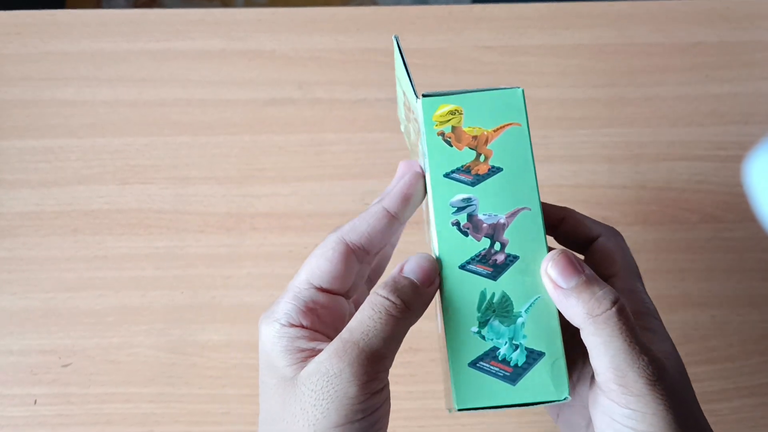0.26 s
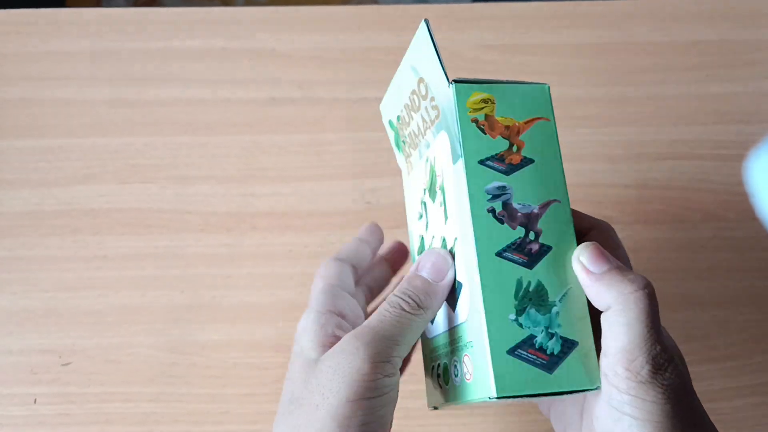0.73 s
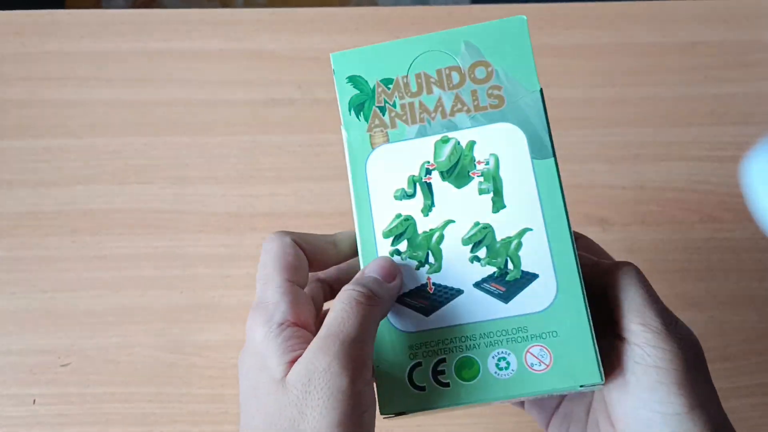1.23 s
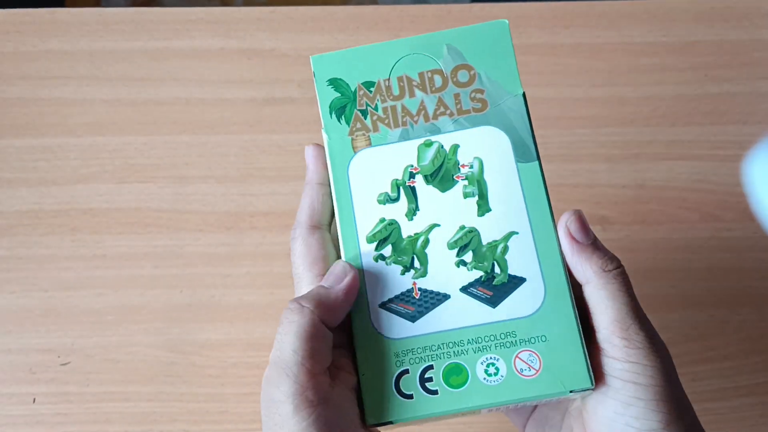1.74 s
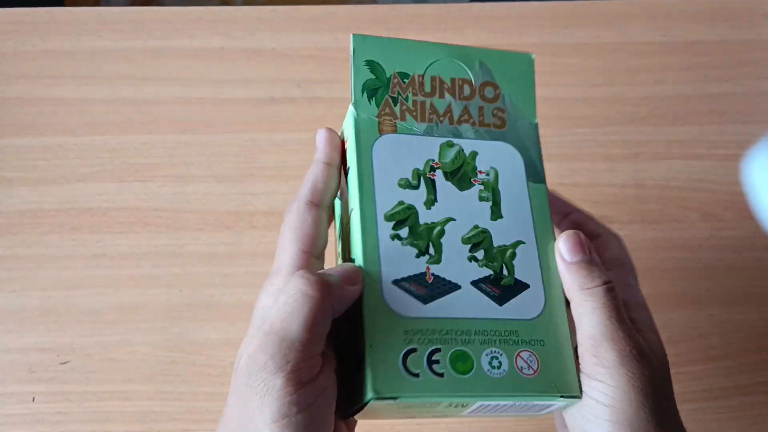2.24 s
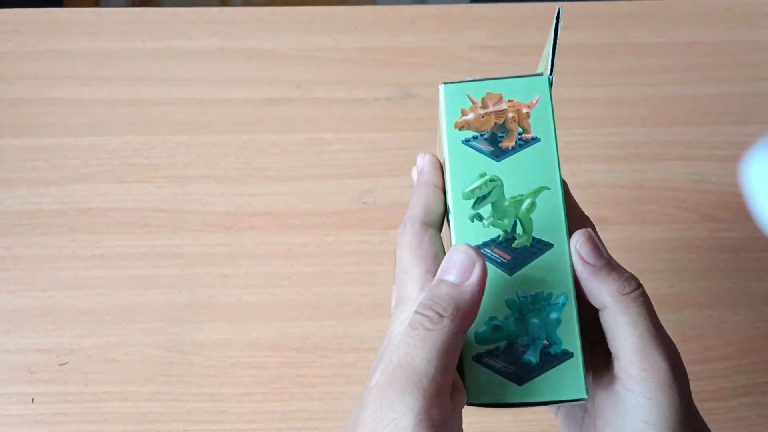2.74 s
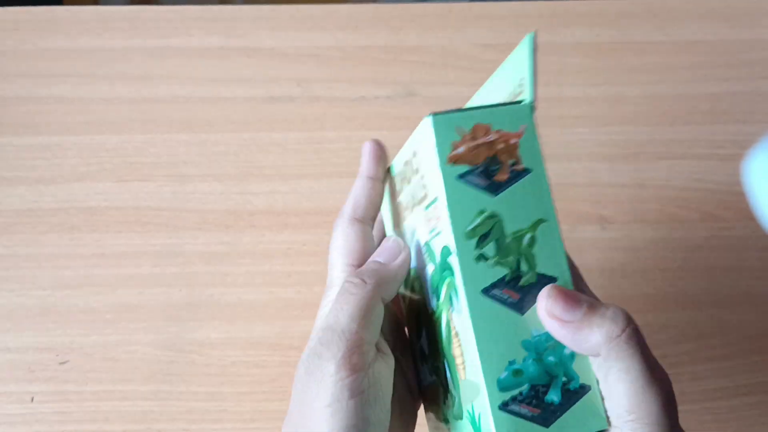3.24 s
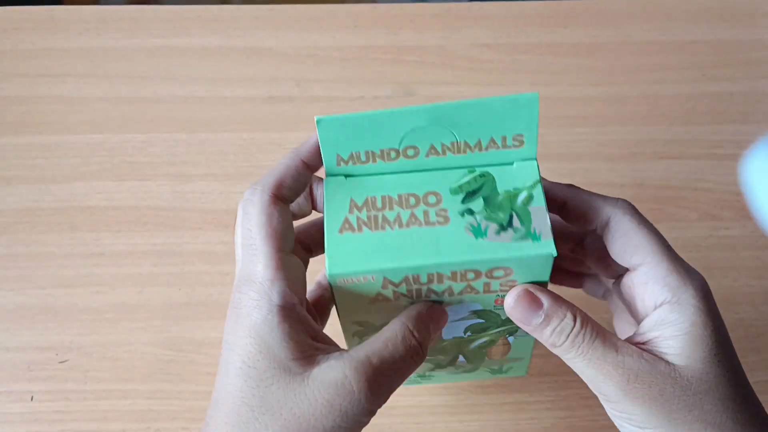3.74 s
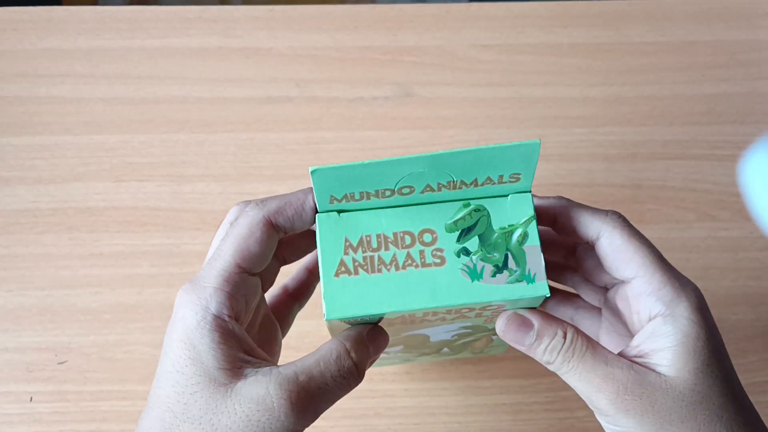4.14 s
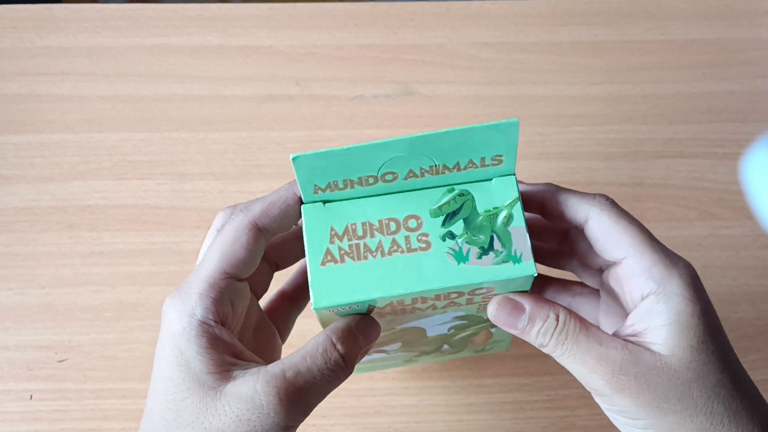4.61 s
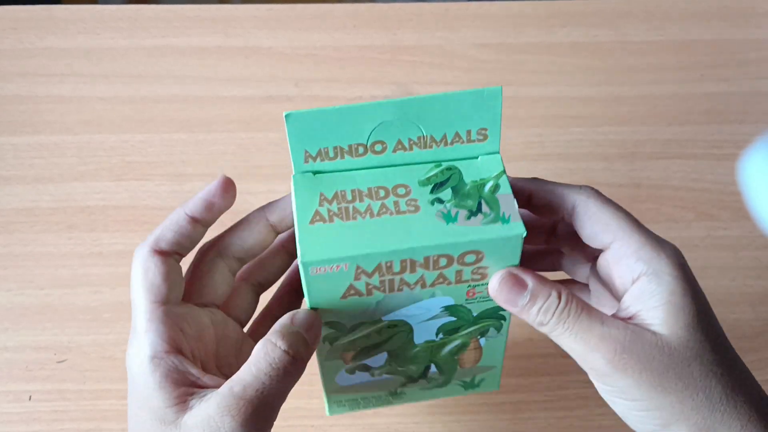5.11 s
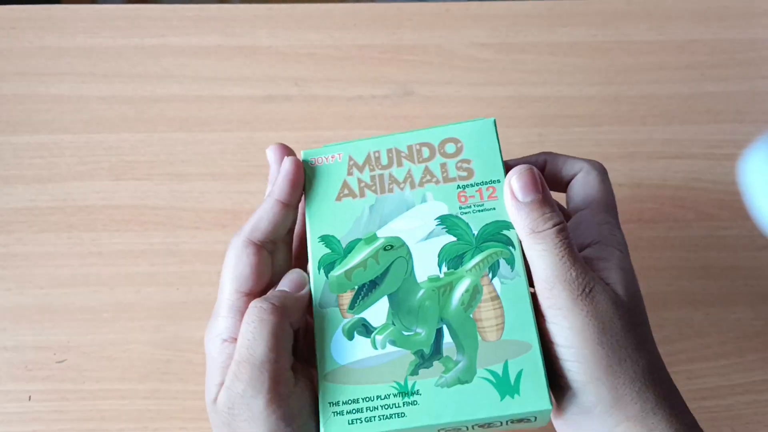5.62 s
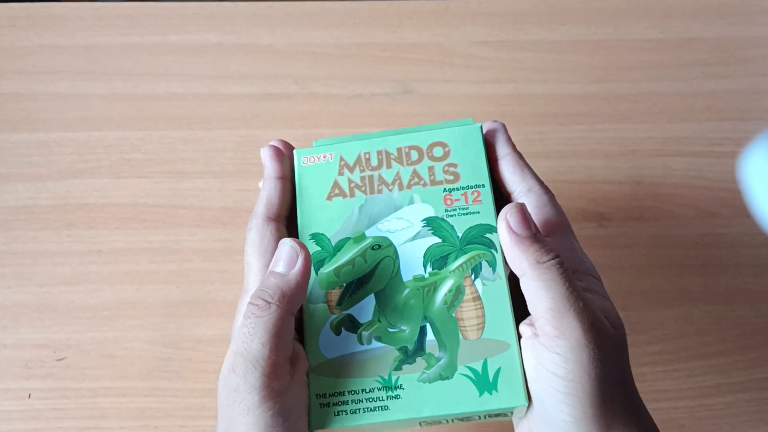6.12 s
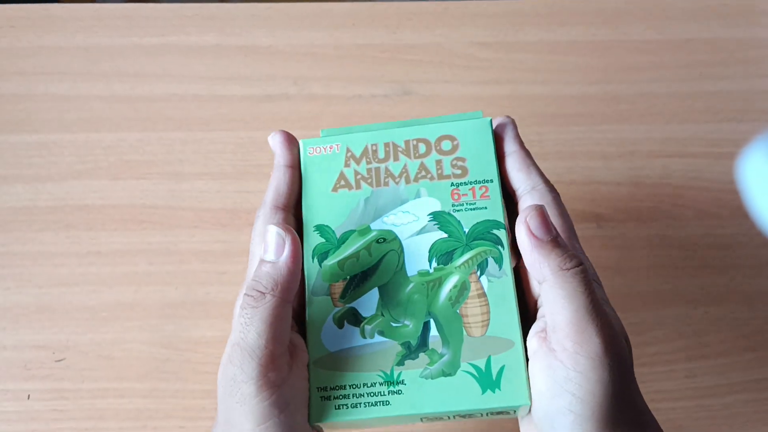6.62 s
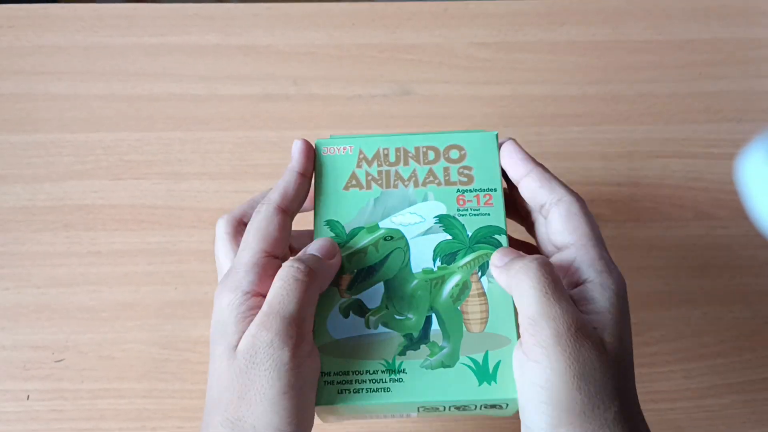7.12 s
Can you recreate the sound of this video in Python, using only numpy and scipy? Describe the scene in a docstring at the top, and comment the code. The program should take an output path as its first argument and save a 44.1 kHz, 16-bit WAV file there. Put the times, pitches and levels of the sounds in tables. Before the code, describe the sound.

Small light cardboard box turned in the hands, dry skin scrapes, ticks, a sharp snap and two hollow pops over low room hum.

```python
"""Cardboard box turned in the hands

In a quiet room, skin slides and catches on card: filtered clicks and sprays of noise that stir the box.
The box snaps once and pops twice, each time a crack of noise with a hollow ring of dying sine waves.
Puffs of low noise are air pushing on the right microphone. Towards the end an engine (a stack of sine
waves) passes outside and a small bird chirps seven gliding whistles. Filtered noise makes the room's
air, and steady sine waves make its mains hum."""
import sys
import numpy as np
from scipy import signal
from scipy.fft import rfft, irfft
from scipy.io import wavfile
from scipy.ndimage import uniform_filter1d

SR = 44100
rng = np.random.default_rng(int(sys.argv[2]) if len(sys.argv) > 2 else 0)


def dump_mix(stems):
    """Bounce the given channels to the path in sys.argv[1] as a 16-bit WAV at rate SR."""
    frames = np.atleast_2d(stems).T  # one column per channel
    limited = np.clip(frames, -1, 1)  # hard clip at full scale
    pcm = np.round(limited * 32767).astype(np.int16)
    wavfile.write(sys.argv[1], SR, pcm)


N = 324576
TIME = np.arange(N) / SR


def amp(db):
    """Turns decibels into a gain."""
    return 10 ** (np.asarray(db) / 20)


def evened(x):
    """Scales a signal to an rms of 1."""
    return x / np.sqrt(np.mean(x ** 2) + 1e-20)


def read(points, hz):
    """Reads a table between its points, on a log-frequency axis."""
    f, value = np.transpose(points)
    return np.interp(np.log(hz + 1), np.log(f + 1), value)


def sides(pan_db):
    """Gives left and right gains; a positive difference favours the left."""
    return amp(np.array([[.5], [-.5]]) * pan_db)


def add(mix, s, sound):
    """Mixes a sound in at time s, cut off at the end of the mix."""
    part = mix[:, max(round(s * SR), 0):][:, :sound.shape[-1]]
    part += sound[..., :part.shape[1]]


def colour(x, points, size=2048):
    """Filters with the given spectrum, without any sound ahead of its cause (minimum phase)."""
    hz = abs(np.fft.fftfreq(size, 1 / SR))
    log_gain = np.log(amp(read(points, hz)))
    spectrum = np.exp(np.conj(signal.hilbert(log_gain)))
    kernel = np.fft.ifft(spectrum).real[:size // 2]
    return signal.fftconvolve(x, kernel[None], axes=1)[:, :x.shape[1]]


def pair(x, same):
    """Turns three unrelated rows into two channels that share a part."""
    same = np.clip(same, 0, 1)
    return np.sqrt(same) * x[:1] + np.sqrt(1 - same) * x[1:]


def drift(size):
    """Makes a smooth random wander of rms 1; a larger size (samples) wanders more slowly."""
    once = uniform_filter1d(rng.standard_normal(N), size, mode="wrap")
    return evened(uniform_filter1d(once, size, mode="wrap"))


# Slides of skin on card, one a row, before the grip and room act on them: (t/s at its fastest, rise/s, fall/s,
# level/dB, hollow body level/dB re that level, fine hiss level/dB re that level,
# f/Hz at which the free card sings, lift there/dB)
SLIDES = [(0.828, 0.089, 0.039, -42, -0.5, -9.5, 910, 5), (0.938, 0.07, 0.12, -39, -2, -16.5, 920, 6.5),
          (1.075, 0.064, 0.13, -43, -2, -18, 910, 0), (1.166, 0.058, 0.049, -30, -3, -9.5, 1190, 6),
          (1.203, 0.035, 0.049, -52, -3, -15, 572, 13.5), (1.436, 0.02, 0.11, -46, -3.5, -16, 524, 3),
          (2.392, 0.022, 0.35, -41.5, 0, -21, 750, 8), (2.485, 0.07, 0.18, -38, 1, -19, 2320, 6),
          (2.58, 0.18, 0.1, -24, -9.5, -6, 367, 12), (2.724, 0.078, 0.03, -36, -5.5, -12.5, 2280, -6),
          (2.93, 0.27, 0.42, -53.5, -8, -18, 5000, 8), (3.335, 0.21, 0.12, -48.5, 0.5, -16, 2320, 8),
          (3.465, 0.061, 0.1, -49.5, 3, -8, 2520, 9), (3.757, 0.11, 0.16, -32.5, -3.5, -7.5, 910, 12.5),
          (3.871, 0.034, 0.027, -37.5, 1, -26, 890, 1), (3.955, 0.046, 0.36, -40.5, -7.5, -14, 970, 7),
          (4.09, 0.093, 0.18, -36, 0, -19, 878, 10), (4.3, 0.18, 0.17, -49, 7, -23, 920, 8.5),
          (5.149, 0.053, 0.023, -41, 2, -17, 605, -11), (5.356, 0.056, 0.085, -41.5, 2, -17, 1250, -0.5),
          (5.575, 0.1, 0.33, -35, -4, -26, 1210, 6.5), (5.678, 0.21, 0.12, -31, 0.5, -7.5, 12800, 8),
          (5.936, 0.034, 0.049, -44.5, 6, -19, 556, 7.5), (7.3, 0.29, 0.5, -47, -21, -22, 5530, 10)]
# Colour of rubbed card: (f/Hz, level/dB per Hz)
CARD_COLOUR = [(120, -36), (230, -1.5), (380, 0), (520, 0), (700, -5), (850, -6), (1150, -8), (1450, -13.5),
               (1800, -7.5), (2350, -10), (3100, -14.5), (4000, -25.5), (5800, -26.5), (7700, -33),
               (15500, -41)]
# The face of the card swells and dies by SWELL_DB over the rise and fall; a BEND above 1 rounds the top
SWELL_DB, BEND = 22, 1.17
# How strongly the others follow: hiss needs speed and comes and goes faster, while the body lingers
HISS_FOLLOWS, BODY_FOLLOWS = 1.13, 0.84


def slides(slips_per_s=3200, spread_db=3, clump_db=2, ring=0.18):
    """Skin sticks and slips: clumps of tiny clicks stir the box, and each slide speeds up, then slows."""
    sizes = amp(spread_db * np.minimum(rng.exponential(1, (3, N)), 4))
    sizes *= rng.choice([-1, 1], (3, N))
    slips = evened(sizes * (rng.random((3, N)) < slips_per_s / SR))
    clumps = amp(clump_db * evened(uniform_filter1d(rng.standard_normal(N), size=260)))
    rub = evened(colour(pair(slips * clumps, 0.5), CARD_COLOUR))
    ringing = box_ring(TIME[:SR // 8])[None]
    hollow = evened(signal.fftconvolve(rub, ringing, axes=1)[:, :N])
    body, face, hiss = map(evened, registers(rub))
    body = evened(body + ring * hollow)

    power = np.zeros((3, N))  # overlapping slides add as powers
    for s, rise, fall, db, body_db, hiss_db, *_ in SLIDES:
        away = np.maximum((s - TIME) / rise, (TIME - s) / fall)
        on = away < 2
        speed_db = -SWELL_DB * away[on] ** BEND
        body_level = body_db + BODY_FOLLOWS * speed_db
        hiss_level = hiss_db + HISS_FOLLOWS * speed_db
        power[:, on] += amp(db + np.array([body_level, speed_db, hiss_level])) ** 2
    gains = np.sqrt(power)
    return sum(gain * sound for gain, sound in zip(gains, (body, face, hiss)))


# Fingertips catching, hollow on a panel and thin on an edge, before the grip and room act on them:
# (t/s, level/dB, body level/dB re that level, hiss level/dB re that level, time to die by 60 dB/s)
SCUFFS = [(0.812, -35, -5, -23, 0.17), (0.928, -38.5, -5.5, -13.5, 0.035), (1.125, -30.5, -9, -19, 0.11),
          (1.158, -30.5, -13, -10, 0.028), (1.164, -30, -23, -29, 0.088), (1.198, -35, -6.5, -16, 0.068),
          (2.381, -44.5, -0.5, -5.5, 0.24), (2.461, -34.5, 1.5, -29, 0.074), (2.548, -22, -3, -6.5, 0.072),
          (2.587, -20, -11, -28, 0.036), (2.608, -22.5, -7.5, -8.5, 0.1), (2.709, -37, -12, -25, 0.1),
          (3.243, -49, 1.5, -24, 0.018), (3.281, -42.5, -18, -21, 0.096), (3.338, -37.5, -9, -17, 0.045),
          (3.467, -43.5, -16, -22, 0.041), (3.572, -43, -12, -17, 0.049), (3.698, -32, -1, -5.5, 0.051),
          (3.733, -39, -16, -12, 0.091), (3.741, -27, -5, -9, 0.07), (3.852, -31.5, -17, -12, 0.042),
          (4.001, -35, -0.5, -14, 0.065), (4.067, -32.5, -4.5, -10.5, 0.21), (4.127, -36, 4, -14, 0.042),
          (4.279, -35, 0.5, -16, 0.058), (4.366, -44.5, -9, -5.5, 0.066), (5.116, -50, 0, -14, 0.055),
          (5.146, -55.5, 2, -6, 0.027), (5.356, -36, 2, -18, 0.052), (5.524, -40.5, -4, -28, 0.019),
          (5.552, -37, -3, -8, 0.088), (5.738, -48, 9, 1, 0.016), (5.759, -42, -14, -1, 0.028),
          (6.059, -50.5, 1.5, -16, 0.085), (7.158, -44, 0, -20, 0.02)]
# Colour of a quick catch: (f/Hz, level/dB per Hz)
CATCH_COLOUR = [(150, -33), (330, 4.5), (600, 8.5), (1000, 4), (1450, 3), (2300, 6.5), (3100, 4.5),
                (4200, -6), (6200, 1.5), (7500, -6.5), (15000, -8.5)]
SCUFF_BITE_S = 0.00033


def scuffs(sharpness=14, size=6000):
    """A fingertip catches: one slip, sharper the harder it is, and a dying spray of smaller ones."""
    out, t = np.zeros((2, N)), TIME[:size]
    for s, db, body_db, hiss_db, t60 in SCUFFS:
        grains = rng.standard_normal((3, size)) * rng.random((3, size)) ** 2
        spray = pair(grains, 0.36) * amp(-60 * t / max(t60, .004))
        spray *= 1 - np.exp(-t / SCUFF_BITE_S)  # the skin takes a moment to bite
        spray[:, 0] += 1 + sharpness * amp(db)
        bands = registers(colour(spray, CATCH_COLOUR))
        # each band is scaled by its loudness over the first 10 ms
        body, face, hiss = (b / np.sqrt(np.mean(b[:, :SR // 100] ** 2)) for b in bands)
        add(out, s, amp(db) * (face + amp(body_db) * body + amp(hiss_db) * hiss))
    return out


# Pops of a panel, before the left-right tilt and the room:
# (t/s, peak level/dB of the hollow ring, peak level/dB of the crack)
POPS = [(2.5875, -22, -5), (4.0951, -10.5, -14), (4.2583, -11, -14)]
# Colour of a panel's crack: (f/Hz, level/dB per Hz)
CRACK_COLOUR = [(300, -34), (1400, 5), (2000, 16), (3200, 16.5), (4600, 7), (6200, 9), (7400, 4.5),
                (9000, -1), (15000, 1)]


def pops(size=6000):
    """A panel buckles with a crack, and the box rings hollow."""
    out, t = np.zeros((2, N)), TIME[:size]
    ring = box_ring(t)
    ring = ring / abs(ring).max()
    for s, ring_db, sharp_db in POPS:
        fibres = pair(rng.standard_normal((3, size)), .4) * amp(-60 * t / .018)
        fibres[:, 0] += 20 * amp(sharp_db)  # the harder the crack, the more it gives way all at once
        crack = colour(fibres, CRACK_COLOUR)
        crack = crack / abs(crack).max()
        add(out, s, sides(-3.5) * (amp(ring_db) * ring + amp(sharp_db) * crack))
    return out


# Notes (modes) the box rings with: (f/Hz, relative level/dB, time to die by 60 dB/s)
BOX_MODES = [(304.6, 2.5, 0.058), (377, 6, 0.033), (538, -4, 0.1), (700, -12, 0.051), (810, 0, 0.057),
             (872, -2, 0.036), (1080, -18.5, 0.03)]


def box_ring(t):
    """The box rings in dying sine waves; neighbouring modes swing opposite ways."""
    return sum((-1) ** k * amp(db - 60 * t / t60) * np.sin(2 * np.pi * hz * t)
               for k, (hz, db, t60) in enumerate(BOX_MODES))


def registers(x):
    """Splits card sound into hollow body, face and fine hiss; the body is partly shared by both sides."""
    edges_hz = [(200, 800), (800, 4000), (4000, 17000)]
    filters = [signal.butter(3, edge, "band", fs=SR, output="sos") for edge in edges_hz]
    body, face, hiss = (signal.sosfilt(f, x) for f in filters)
    return body + .6 * body[::-1], face, hiss


def restless(x, patchy_db):
    """The contact point keeps moving, so each few milliseconds of rubbing has its own colour."""
    z = signal.stft(x, nperseg=256, noverlap=192)[2]
    patches = uniform_filter1d(rng.standard_normal(z.shape[1:]), size=5, axis=0)  # across pitch
    patches = evened(uniform_filter1d(patches, size=6, axis=1))  # across time
    gain = evened(amp(patchy_db * np.clip(patches, -2, 2)))
    return signal.istft(z * gain, nperseg=256, noverlap=192)[1][:, :x.shape[1]]


def card_ring(x, ring_db=-6, ring_t60=0.073, regrip_hz=3.7, size=2600):
    """The card rings in dense, short modes, blended from two sets as the grip changes."""
    modes = rng.standard_normal((2, 2, size)) * amp(-60 * TIME[:size] / ring_t60)
    modes /= np.linalg.norm(modes, axis=2, keepdims=True)
    grip = 2 * np.pi * regrip_hz * TIME
    shares = [np.cos(grip), np.sin(grip)]
    ring = sum(signal.fftconvolve(x * share, m, axes=1)[:, :N] for share, m in zip(shares, modes))
    return (x + amp(ring_db) * ring) / np.sqrt(1 + amp(2 * ring_db))


def panels(x, sharpness=13):
    """Each grip frees a stretch of card that lifts (or dips) its own pitch until the next slide."""
    out = x.copy()
    grips = [s - rise / 2 for s, rise, *_ in SLIDES] + [N / SR]
    for start, end, (*_, hz, lift_db) in zip(grips, grips[1:], SLIDES):
        held = x[:, round(start * SR):round(end * SR)]
        held = np.pad(held, [(0, 0), (0, SR // 10)])  # room for the resonance to die away
        sung = signal.lfilter(*signal.iirpeak(hz, sharpness, SR), held)
        add(out, start, (amp(lift_db) - 1) * sung)
    return out


def facing(x, left_db=4, right_db=-3, right_lag_s=0.000028):
    """The box is nearer the left microphone: it arrives there first, with more of its finest hiss."""
    hz = np.fft.rfftfreq(N, 1 / SR)
    lag = np.exp(-2j * np.pi * hz * np.array([[0], [right_lag_s]]))
    finest = np.interp(hz, [8500, 12000], [0, 1])
    gain = amp(np.array([[left_db], [right_db]]) * finest)
    return irfft(rfft(x) * lag * gain, N)


# Air buffeting the right microphone: (t/s at the peak, rms level/dB there, half length/s)
GUSTS = [(.652, -15.5, 0.013), (.671, -8.5, 0.0043), (.712, -26.5, 0.028), (.835, -26.5, 0.013),
         (.917, -27.5, 0.019), (2.641, -42, 0.048), (3.022, -25.5, 0.016), (3.145, -33, 0.016),
         (3.275, -32.5, 0.024), (3.914, -17, 0.002), (3.943, -24, 0.0088), (4.038, -20.5, 0.0075),
         (4.083, -28, 0.021), (5.595, -23, .026), (5.72, -27, 0.035)]
# Harder gusts reach higher: the centre for a gust at 0 dB in Hz, and its fall in octaves per dB below that
GUST_HZ, GUST_SINK = 123.2, 0.011


def gusts(octaves=0.7, left_db=-26, lowest_hz=42, size=16384):
    """Eddies of air push on the right microphone: short swells of low noise, faint on the left."""
    out, t = np.zeros((2, N)), (np.arange(size) - size // 2) / SR
    hz = np.fft.rfftfreq(size, 1 / SR)
    no_deep_bass = (1 - np.exp(-(hz / lowest_hz) ** 2)) ** 2  # the microphone passes none
    for s, db, length in GUSTS:
        centre_hz = GUST_HZ * 2 ** (GUST_SINK * db)
        shape = np.exp(-.5 * (np.log2((hz + 1) / centre_hz) / octaves) ** 2)
        swell = np.exp(-.5 * (t / length) ** 2)
        eddy = swell * irfft(rfft(rng.standard_normal(size)) * shape)
        eddy = irfft(rfft(eddy) * no_deep_bass)
        eddy *= np.linalg.norm(swell) / np.linalg.norm(eddy)
        add(out, s + t[0], amp([[db + left_db], [db]]) * eddy)
    return out


# Loudness of the engine: (t/s, firing note level/dB, overtones level/dB), before each order's own level
ENGINE_LEVELS = [(0, -60, -74), (4.3, -46, -58), (4.85, -56, -41.5), (5.3, -39, -47), (6.1, -36.5, -45.5),
                 (6.4, -41.5, -42.5), (6.8, -35.5, -33.5), (7.36, -46, -45.5)]
# Its orders: (multiple of the cycle rate, level/dB re the levels above)
ENGINE_ORDERS = [(2, -3.5), (3, -18), (4, -10.5), (5, -6.5), (6, -14.5), (7, -19), (8, -23), (9, -15.5),
                 (10, -24), (13, -31.5)]
# The cycle rate holds, then sinks steadily
ENGINE_HZ, SINKS_FROM_S, SAG_HZ_PER_S = 45.36, 4.0, 0.77


def engine(waver_db=5.0, wander=0.0023):
    """Low orders of an engine heard through the wall, sinking in pitch as it goes by."""
    s, *columns = np.transpose(ENGINE_LEVELS)
    firing_db, overtones_db = (np.interp(TIME, s, c) for c in columns)
    hz = ENGINE_HZ - SAG_HZ_PER_S * np.maximum(TIME - SINKS_FROM_S, 0)
    turns = np.cumsum(hz * (1 + wander * drift(size=4000))) / SR
    orders = np.zeros(N)
    for k, order_db in ENGINE_ORDERS:
        k = round(k)
        level_db = firing_db if k == 2 else overtones_db
        gain = amp(order_db + level_db + waver_db * drift(size=5000))
        orders += gain * np.sin(2 * np.pi * (k * turns + rng.random()))
    return np.sqrt(2) * orders * sides(.7)


# Chirps, one a row, before wobble, tremble and room: (t/s at the start, top f/Hz, rms level/dB at its fullest)
CHIRPS = [(6.188, 4530, -68), (6.363, 4220, -66.5), (6.524, 3980, -60), (6.695, 3880, -58),
          (6.875, 3900, -56), (7.04, 3760, -61), (7.195, 3770, -60.5)]
CHIRP_S = 0.13


def bird(tremble_db=2.0, wobble_share=0.012):
    """A bird gives thin, trembling whistles that arch up to their top pitch."""
    out, wobble, tremble = np.zeros((2, N)), drift(size=80), drift(size=300)
    u = np.linspace(0, 1, int(CHIRP_S * SR))  # progress through the chirp
    for s, top_hz, db in CHIRPS:
        at = (round(s * SR) + np.arange(len(u))) % N
        arch = 1 - .085 * (u / .65 - 1) ** 2
        hz = top_hz * (arch + wobble_share * wobble[at])
        whistle = np.sqrt(2) * np.sin(2 * np.pi * np.cumsum(hz) / SR)
        add(out, s, amp(db + tremble_db * tremble[at]) * np.sin(np.pi * u) * whistle)
    return out


# How long the room rings: (f/Hz, time to die by 60 dB/s)
ROOM_DECAY = [(100, 0.11), (500, 0.19), (2000, 0.17), (5000, 0.12), (12000, 0.12)]


def room(x, first_s, size=20):
    """The room sends back sparse reflections of random sign, each band dying at its own speed."""
    taps = np.zeros((2, SR))
    at = np.arange(0, SR - size, size)
    at = at + rng.integers(0, size, (2, len(at)))
    signs = rng.choice([-1., 1.], at.shape) * (at > first_s * SR)  # silent before the first echo
    np.put_along_axis(taps, at, signs, 1)
    hz, t, z = signal.stft(taps, SR, nperseg=256)
    decay = amp(-60 * t / read(ROOM_DECAY, hz)[:, None])
    tail = signal.istft(z * decay, SR, nperseg=256)[1]
    return signal.fftconvolve(x, tail / np.linalg.norm(tail[0]), axes=1)[:, :N]


# Colour of the room's air: (f/Hz, level/dB per Hz)
AIR_COLOUR = [(25, -19), (45, -16.5), (70, -0.5), (125, 0), (230, -2), (330, -7), (520, -7.5), (800, -12.5),
              (1300, -11), (2500, -18.5), (3700, -27.5), (5000, -35), (7200, -37.5), (10500, -46),
              (15500, -47)]
# Likeness of the two sides: (f/Hz, left-right likeness from 0 to 1)
AIR_SAME = [(100, 1), (300, 0.79), (1400, 0.55), (3100, 0.33), (7000, 0.026)]
# Balance of the two sides: (f/Hz, left-right level/dB)
AIR_TILT = [(60, -16.5), (200, 5.5), (380, 0), (700, -1.5), (4400, -1.5), (8100, -6), (15000, 7)]
AIR_DB = -45.5  # before the slow drift and the later rise


def room_tone(whine_hz=6290, whine_width_hz=110, whine_db=10, traffic_db=2.5, left_lag_s=0.0004):
    """Room noise from the right, with a thin high whine; it rises a little as the engine passes."""
    hz = np.fft.rfftfreq(N, 1 / SR)
    a, b = rfft(rng.standard_normal((2, N)))
    same = np.clip(read(AIR_SAME, hz), -1, 1)
    left = a * np.exp(-2j * np.pi * hz * left_lag_s)
    right = same * a + np.sqrt(1 - same ** 2) * b
    whine = whine_db * np.exp(-((hz - whine_hz) / whine_width_hz) ** 2)
    shape = amp(read(AIR_COLOUR, hz) + whine)
    air = evened(irfft(np.array([left, right]) * shape * sides(read(AIR_TILT, hz)), N))
    rise_db = traffic_db * np.interp(TIME, [5.6, 7.3], [0, 1])
    return air * amp(AIR_DB + .5 * drift(size=6000) + rise_db)


# Mains hum: (f/Hz, rms level/dB midway between the sides, left-right level/dB, left lead/radians)
HUM = [(99.8, -42, 4.5, 0.58), (202, -54.5, -5.5, 0), (293, -69.5, -10, 0.28)]


def hum():
    """Mains hum and its overtones are steady sine waves."""
    out = np.zeros((2, N))
    for hz, db, pan_db, lead in HUM:
        wave = np.sin(2 * np.pi * hz * TIME + np.array([[lead], [0]]))
        out += np.sqrt(2) * amp(db) * sides(pan_db) * wave
    return out


def scene(rub_room_db=-12, pop_room_db=-12, bird_room_db=-1):
    """Puts the box close by and the bird far off, over the sound of the room."""
    rubs = restless(slides() + scuffs(), patchy_db=3.5)
    rubs = panels(card_ring(rubs))
    knocks, chirps = pops(), bird()
    sent = amp(rub_room_db) * rubs + amp(pop_room_db) * knocks + amp(bird_room_db) * chirps
    wet = room(sent, first_s=0.0075)
    return facing(rubs + knocks + wet) + chirps + gusts() + engine() + room_tone() + hum()


EDGE_HZ = 15900


def record(dry):
    """Removes the treble above EDGE_HZ with a steep low-pass filter."""
    low_pass = signal.firwin(511, EDGE_HZ, window=("kaiser", 9), fs=SR)
    return signal.oaconvolve(dry, low_pass[None], "same")


dry = scene()
out = record(dry)
dump_mix(out)
```